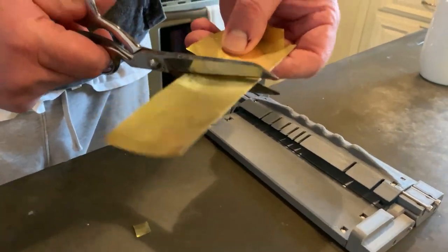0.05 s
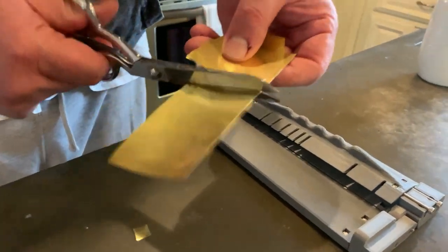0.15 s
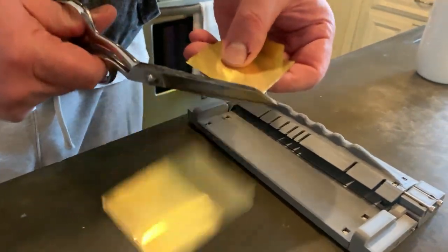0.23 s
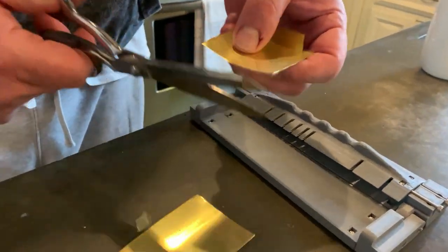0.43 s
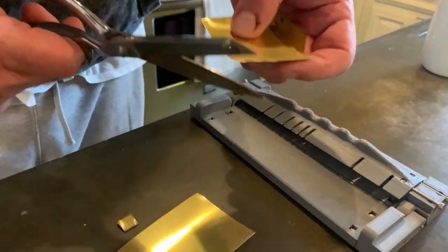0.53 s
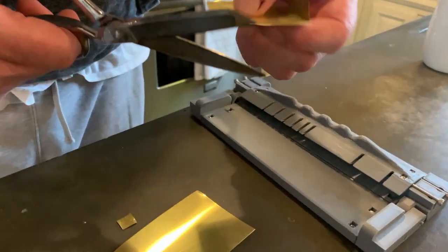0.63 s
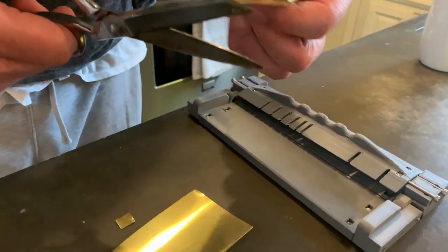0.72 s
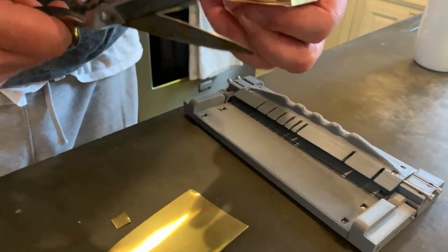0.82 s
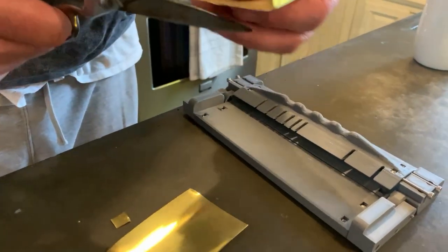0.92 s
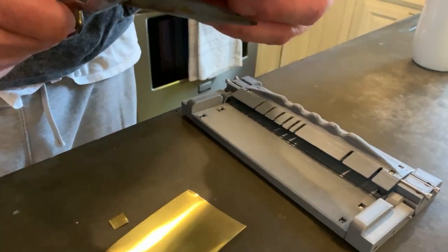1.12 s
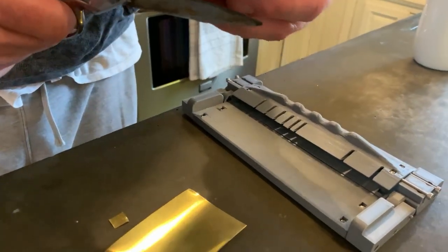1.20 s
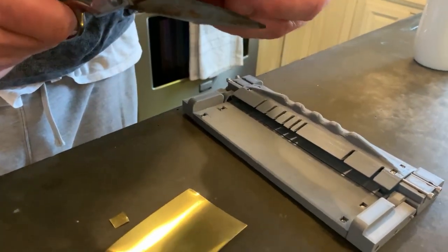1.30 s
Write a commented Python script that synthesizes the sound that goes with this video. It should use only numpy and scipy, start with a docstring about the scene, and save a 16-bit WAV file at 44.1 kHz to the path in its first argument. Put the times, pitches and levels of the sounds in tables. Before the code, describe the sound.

Scissors crunch through thin brass and snap shut close to the microphone. The cut piece clatters and rings on a kitchen countertop, then the blades slide open with a faint squeal over a low appliance hum.

```python
"""In a kitchen, scissors crunch through a strip of thin brass and snap shut, close to a camera's two
microphones. The freed piece rings as it falls, lands on the countertop and chatters to rest. The
blades slide open, sticking and slipping with a thin squeal, and fingers rub on the metal.
An appliance hums behind it all. The camera turns its volume down at the loud snap, then slowly up."""
import sys
import numpy as np
from scipy import signal
from scipy.fft import rfft, irfft, next_fast_len
from scipy.io import wavfile
from scipy.ndimage import uniform_filter1d, map_coordinates

SR = 44100
rng = np.random.default_rng(int(sys.argv[2]) if len(sys.argv) > 2 else 0)


def to_wav(sig):
    """Store sig (one row per channel, or 1-D mono) as 16-bit WAV at the path in sys.argv[1].

    Samples outside -1..1 are clipped; the rate is SR.
    """
    pcm = np.clip(np.atleast_2d(sig), -1, 1) * 32767
    pcm = np.round(pcm).astype(np.int16)
    wavfile.write(sys.argv[1], SR, pcm.T)  # frames by channels


N = 59535
T = np.arange(N) / SR
FFT_SIZE = next_fast_len(N + SR)
HZ = np.fft.rfftfreq(FFT_SIZE, 1 / SR)

# Moments in the cut: t/s, level/dB
TICKS = [(.0605, -29.5), (.069, -40), (.0838, -29), (.0875, -38), (.092, -42), (.099, -42), (.126, -45)]  # the brass gives under the blades
KNOCKS = [(0.2438, -15), (0.2503, -28.5)]  # the handles meet
# Stages of the cut: t/s, level/dB, rise/s, fade/s (a fade is the time to drop by 60 dB)
CRUNCHES = [(.163, -48.5, 0.0064, 0.056), (.179, -47.5, 0.005, 0.076), (.195, -43, 0.004, 0.07)]  # the blades grind on
TEARS = [(.236, -33, 0.0036, 0.013), (.2398, -20.5, 0.00067, 0.09), (.2463, 3, .0003, 0.0061)]  # the last bit tears
SNAPS = [(.2437, 0, .0003, 0.0085), (.2478, 5.5, .0004, .008), (.251, -16.5, 0.00094, 0.045)]  # the blades break through and shut
# The colour of each sound, or how strong its low and high parts are: f/Hz, level/dB
TICK_COLOUR = [(200, -11.5), (600, -9.5), (1100, 7), (1600, -15), (2300, 9.5), (3500, -7.5), (6000, -13.5),
               (8000, -4.5), (10000, -23.5), (15000, -16)]
CRUNCH_COLOUR = [(300, -16.5), (700, -15), (1000, 3.5), (1500, -11.5), (3300, -13), (4450, -9),
                 (5200, -17.5), (6400, -10.5), (9000, -19), (12000, -12.5), (15000, -21)]
TEAR_COLOUR = [(200, -18.5), (1000, -19), (2500, -8), (3600, -15.5), (4600, -16.5), (6400, 2), (8000, 7.5),
               (10000, -24.5), (15000, -12.5)]
SNAP_COLOUR = [(60, -29), (400, -25.5), (700, -24.5), (1000, -5.5), (1350, -22.5), (1750, -11.5),
               (2700, -15), (3550, -12), (4200, -15), (6400, -9.5), (8500, -3.5), (9050, -1), (10000, -1.5),
               (12500, -3.5), (14000, -0.5), (15300, 1.5)]
STEEL_COLOUR = [(400, -23.5), (1200, -14), (2000, -3), (2800, -14), (3600, 3.5), (4200, -2.5),
                (6500, -10.5), (8400, -7), (9200, -3), (10000, -1), (12500, -6.5), (13800, 0.5),
                (15300, -5.5)]
# The handles' hollow tones: f/Hz, level/dB, fade/s
HANDLE_TONES = [(170, -19, .07), (430, -15, .025), (1020, 2, .03), (1760, -3, .02)]
# How much louder the cut is on the left: f/Hz, level/dB
CUT_PAN = [(300, 1.5), (1000, 5), (2500, -2.5), (5300, -3.5), (8000, 0.5), (14000, -0.5)]


def scissor_cut():
    """The brass ticks, crunches and tears; the blades snap shut, the handles knock and the steel rings."""
    cracks = [(start, db, .0004, .013) for start, db in TICKS]
    tails = [(start, db - 15, .001, .12) for start, db in TICKS]
    ticks = coloured(burst(cracks + tails), TICK_COLOUR)
    crunch = coloured(slips(CRUNCHES, grain_db=1), CRUNCH_COLOUR)
    # The strip pings as the blades bite again.
    ping = swell([(CRUNCHES[0][0], -49.5, .002, .09)]) * pitched_noise(hz=4480, width_hz=120)
    tear = coloured(burst(TEARS), TEAR_COLOUR)
    snap = coloured(burst(SNAPS), SNAP_COLOUR)
    knock = np.zeros(N)
    for start, knock_db in KNOCKS:
        age = np.maximum(T - start, 0)
        for hz, db, fade in HANDLE_TONES:
            loudness = amp(knock_db + db - 60 * age / fade) * (1 - np.exp(-age * hz))
            knock += loudness * np.sin(2 * np.pi * hz * age)
    ring = coloured(burst([(SNAPS[1][0], -27, .002, .26)]), STEEL_COLOUR)
    return microphones(ticks + crunch + ping + tear + snap + knock + ring, CUT_PAN)


# The piece hits the countertop: t/s, level/dB
BOUNCES = [(0.3538, -21.5), (0.3677, -12.5), (0.3747, -12), (0.3773, -12.5), (0.3779, -5.5),
           (0.3809, -13.5), (0.3864, -22), (0.3901, -18), (0.393, -13.5), (0.394, -14), (0.4042, -22.5),
           (0.4127, -19), (.425, -23), (0.434, -28), (0.4425, -24.5)]
# The rest of its landing: t/s, level/dB, rise/s, fade/s
CHATTER = [(.38, -20, 0.014, .2), (.411, -23.5, .006, 0.15), (.433, -33, 0.0063, 0.14),
           (.453, -29.5, .007, 0.037)]  # fine buzzing between bounces
THUDS = [(.365, -36.5, 0.00202, 0.066), (.465, -45.5, 0.002044, 0.11)]  # air and countertop thud as it lands flat
SKIDS = [(.368, -16, 0.0027, 0.027), (.466, -34, 0.0038, .03), (.513, -26, 0.017, 0.098),
         (.57, -45, 0.057, 0.17)]  # its edge scrapes along
# The piece's strongest ringing tones, then the colours of its landing: f/Hz, level/dB
BRASS_TONES = [(1885, -6), (1967, -8), (3667, -9), (4428, -5), (4487, -3), (4560, 0), (4655, 0), (4785, -1),
               (4826, -1), (4955, -5), (5073, -4), (5171, -5), (6373, -6), (6586, -4)]
BRASS_COLOUR = [(300, -36), (1400, -30), (1900, -9), (2500, -17), (3100, -14), (3700, -6), (4100, -9),
                (4700, 0), (5300, -6), (5800, -12), (6800, -8), (7700, -12), (9000, -12), (12000, -16),
                (15300, -20)]
THUD_COLOUR = [(50, -11.5), (170, -6.5), (400, -1.5), (600, -19), (1000, 0.5), (1600, -14), (4000, -23)]
SKID_COLOUR = [(300, -20), (1300, -17), (2500, -3.5), (3400, 1.5), (4200, 0), (5300, 2), (6800, 3),
               (7600, -0.5), (8600, -2.5), (11000, -1), (15000, 2.5)]
# How much louder the piece is on the left: f/Hz, level/dB
BRASS_PAN = [(1000, 6.5), (2000, -3.5), (3500, -3.5), (5000, -6.5), (7000, -3.5), (9000, -2)]


def falling_brass(weak_count=130):
    """The piece flexes and sings in the air, then each bounce on the countertop rattles and rings it."""
    flight = swell([(.325, -35, .043, .48)]) * pitched_noise(hz=2135, width_hz=550)
    hits = burst([(start, db, .0005, .011) for start, db in BOUNCES])
    force = hits + slips(CHATTER, grain_db=-1, rate=400)
    rattle = coloured(force, BRASS_COLOUR)
    # Many weaker tones are scattered from 1800 to 11000 Hz.
    spread = (np.arange(weak_count) + rng.random(weak_count)) / weak_count
    weak_hz = 1800 * (11000 / 1800) ** spread
    weak_tones = zip(weak_hz, value_at(BRASS_COLOUR, weak_hz))
    weak_ring = amp(-9.5) * ringing(force, weak_tones, fade_s=.23)
    strong_ring = amp(-3) * ringing(force, BRASS_TONES, fade_s=.18)
    thud = coloured(burst(THUDS), THUD_COLOUR)
    piece = microphones(flight + rattle + strong_ring + weak_ring + thud, BRASS_PAN)
    skid = coloured(slips(SKIDS, grain_db=2), SKID_COLOUR)
    return piece + microphones(skid)


# The blades open: t/s, level/dB, rise/s, fade/s
SQUEALS = [(.516, -34.5, 0.0045, 0.11), (.574, -35.5, 0.006, 0.15), (.597, -36.5, 0.0054, 0.075),
           (.612, -34.5, 0.0013, .12), (.635, -44.5, .005, 0.12), (.66, -47.5, 0.0082, 0.11),
           (.682, -49.5, .01, 0.1), (.725, -57.5, .01, 0.12)]  # they stick and squeal
SLIDES = [(.53, -49, 0.021, 0.77), (.7, -57.5, 0.088, 0.53), (.85, -62, 0.067, 0.24)]  # they slide softly
# The blades' high tones, then the colour of their sliding: f/Hz, level/dB
BLADE_TONES = [(7878, -23), (10541, -13), (11450, -1), (12930, -9), (14218, -23), (14678, -1), (15125, -8)]
SLIDE_COLOUR = [(400, -0.5), (1100, 0.5), (2200, 3), (3000, -8), (4300, -2.5), (6000, -29), (8000, -20),
                (11000, -12), (15000, -12)]


def opening_blades(wander_hz=32, sink_hz_per_s=1100):
    """Blade rubs on blade, making a gritty squeal, a soft hiss and one faint tone that sinks."""
    tones = sum(amp(db + 2 * wobble(98)) * sine(hz + wander_hz * wobble(400)) for hz, db in BLADE_TONES)
    rasp = .5 * pitched_noise(hz=14900, width_hz=820) * 2 * amp(.5)
    squeal = swell(SQUEALS) * (unit(tones) + rasp)
    grit = amp(-12) * coloured(slips(SQUEALS, grain_db=3.5), SKID_COLOUR)
    last_slide_s = SLIDES[-1][0]
    sinking_hz = 4320 - sink_hz_per_s * (T - last_slide_s) + 2 * wander_hz * wobble(550)
    sinking_tone = swell([(last_slide_s, -70.5, .12, .7)]) * np.sqrt(2) * sine(sinking_hz)
    hiss = coloured(slips(SLIDES, grain_db=2.5), SLIDE_COLOUR)
    return microphones(squeal + grit + sinking_tone + hiss)


# Fingers shift their grip: t/s, level/dB, rise/s, fade/s
RUBS = [(.02, -58.5, .05, 0.75), (.957, -54.5, 0.00094, 0.062), (.976, -54.5, 0.012, 0.069),
        (1.102, -58, .018, 0.15), (1.225, -70.5, 0.0053, .1), (1.26, -71, 0.008, 0.096)]
# The colour of skin on metal: f/Hz, level/dB
RUB_COLOUR = [(400, 2.5), (1000, -2.5), (2000, -3), (3200, -3), (4500, -3), (6300, -10), (8000, -13),
              (10500, -7.5), (15000, -7)]


def fingers():
    """Fingers rub on the scissors and the rest of the strip."""
    return microphones(coloured(slips(RUBS, grain_db=2), RUB_COLOUR))


# The colour of the air noise, then the appliance's tones: f/Hz, level/dB
AIR_COLOUR = [(25, -13), (60, -1.5), (110, 1), (220, -3.5), (400, -5), (700, -16.5), (1100, -8),
              (1800, -23.5), (3500, -30.5), (8000, -39), (15000, -33)]
HUM_TONES = [(80.7, -73.5), (120.5, -74.5), (161, -63.5), (563, -69)]


def kitchen():
    """The air rushes steadily and an appliance gives a wavering hum."""
    shared, side = coloured(rng.standard_normal((2, N)), AIR_COLOUR)
    # Deep sound is nearly the same on the left and right.
    side = filtered(side, amp(value_at([(100, -11.5), (400, -1), (1500, -1)], HZ)))
    hum = np.zeros(N)
    for hz, db in HUM_TONES:
        loudness = amp(db + 1.8 * wobble(15)) * np.sqrt(2)
        hum += loudness * np.sin(2 * np.pi * hz * T + .3 * wobble(5.1))
    return amp(-64.5) * np.array([shared + side, shared - side]) + hum


# How long the kitchen's echo lasts: f/Hz, fade/s
ECHO_FADES = [(200, 0.17), (2000, 0.5), (5000, 0.43), (14000, 0.073)]


def room_echo(x, build_s=.0039):
    """The kitchen sends back a short, dull echo, different at each microphone."""
    hz, t, noise = signal.stft(rng.standard_normal((2, SR // 2)), SR, nperseg=256)
    loudness = amp(-60 * t / value_at(ECHO_FADES, hz)[:, None]) * (1 - np.exp(-t / build_s))
    tail = signal.istft(noise * loudness, SR, nperseg=256)[1]
    dulling = amp(value_at([(6000, -.5), (12000, -18.5)], HZ))
    return filtered(x, rfft(tail / np.linalg.norm(tail[0]), FFT_SIZE) * dulling)


# How much later sound reaches the left microphone: f/Hz, delay/s
LEFT_DELAY = [(1400, .00005), (2300, .000183)]
# Sound bouncing off the countertop and hands: f/Hz, level/dB
REFLECTION_COLOUR = [(200, -17), (1000, -4.5), (3000, -7.5), (6500, -6), (9000, -11), (15000, -3.5)]


def microphones(x, pan=((1000, 0),), fade_s=.024):
    """Sound reaches the right microphone first; nearby surfaces reflect it differently to each."""
    side = np.array([[1], [-1]])  # left, right
    direct = np.exp(-1j * np.pi * HZ * value_at(LEFT_DELAY, HZ) * side)
    tail = rng.standard_normal((2, N)) * amp(-60 * T / fade_s)
    tail /= np.linalg.norm(tail, axis=1, keepdims=True)
    reflected = rfft(tail, FFT_SIZE) * amp(value_at(REFLECTION_COLOUR, HZ))
    balance = amp(side * value_at(pan, HZ) / 2)
    return filtered(x, balance * (direct + reflected))


def swell(events):
    """Loudness over time for events that rise to their level and die away; their powers add."""
    power = np.zeros(N)
    for peak_s, db, rise, fade in events:
        before, after = np.minimum(T - peak_s, 0), np.maximum(T - peak_s, 0)
        power += amp(db - 60 * after / fade) ** 2 * np.exp(-(before / rise) ** 2)
    return np.sqrt(power)


def burst(events):
    """A crack of noise for each event."""
    return swell(events) * rng.standard_normal(N)


def slips(events, grain_db, rate=900):
    """Rubbing as many tiny slips and bumps; grain_db sets how uneven they are."""
    return swell(events) * unit(rng.standard_normal(N) * amp(grain_db * wobble(rate)))


def pitched_noise(hz, width_hz):
    """Noise gathered around one pitch, like a rough ringing."""
    return unit(filtered(rng.standard_normal(N), 1 / (1 + (2 * (HZ - hz) / width_hz) ** 2)))


def ringing(force, tones, fade_s):
    """Each push on the metal starts its tones, which then fade."""
    t = T[:N // 3]
    ring = sum(amp(db - 60 * t / fade_s) * np.sin(2 * np.pi * (hz * t + rng.random())) for hz, db in tones)
    return filtered(force, rfft(ring / np.linalg.norm(ring), FFT_SIZE))


def sine(hz):
    """A pure tone that follows a changing pitch."""
    return np.sin(2 * np.pi * np.cumsum(hz) / SR)


def wobble(rate):
    """A smooth random curve through `rate` points a second."""
    return map_coordinates(rng.standard_normal(N), [T * rate + 2])


def coloured(x, colour):
    """Give noise a colour while keeping its power."""
    gain = unit(amp(value_at(colour, HZ)) * (treble_limit() + .01))
    cepstrum = irfft(np.log(gain), FFT_SIZE)
    # Folding the second half onto the first makes the filter ring only after a hit.
    cepstrum[1:FFT_SIZE // 2] *= 2
    cepstrum[FFT_SIZE // 2 + 1:] = 0
    return filtered(x, np.exp(rfft(cepstrum)))


def filtered(x, response):
    """Multiply each frequency in x by its response."""
    return irfft(rfft(x, FFT_SIZE) * response, FFT_SIZE)[..., :N]


def treble_limit(top_hz=15800):
    """A response that cuts off sharply above top_hz."""
    return 1 / (1 + (HZ / top_hz) ** 220)


def value_at(points, hz):
    """Read between a table's rows, with frequency spaced by octaves."""
    row_hz, values = np.transpose(points)
    return np.interp(np.log(hz + 1), np.log(row_hz + 1), values)


def amp(db):
    """Turn decibels into a multiplier."""
    return 10 ** (np.asarray(db) / 20)


def unit(x):
    """Scale x to an average power of 1."""
    return x / np.sqrt(np.mean(x ** 2) + 1e-20)


def scene():
    """The close sounds, their echo and the kitchen behind."""
    close = scissor_cut() + falling_brass() + opening_blades() + fingers()
    return close + amp(-17) * room_echo(close) + kitchen()


def record(dry):
    """The camera turns loud sound down at once, recovers slowly and cuts the highest treble."""
    limit_db, recovery_db_per_s, window_s = -15, 35.5, .0018
    window = int(window_s * SR)
    power = np.abs(uniform_filter1d(np.mean(dry ** 2, 0), window))
    excess_db = np.maximum(10 * np.log10(power + 1e-12) - limit_db, 0)
    recovery_db = recovery_db_per_s * T
    dip_db = np.maximum.accumulate(excess_db + recovery_db) - recovery_db
    return filtered(dry * amp(-uniform_filter1d(dip_db, window)), treble_limit())


dry = scene()
out = record(dry)
to_wav(out)
```